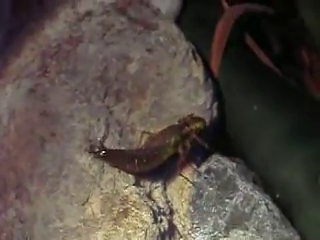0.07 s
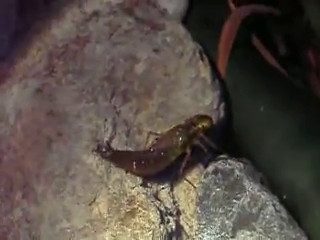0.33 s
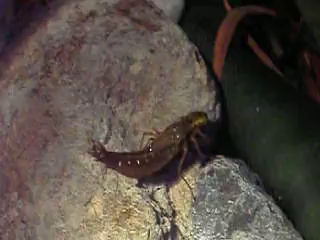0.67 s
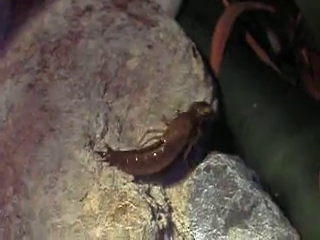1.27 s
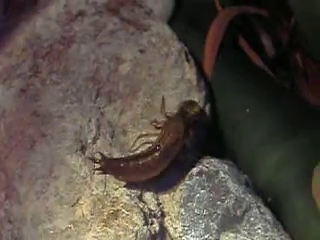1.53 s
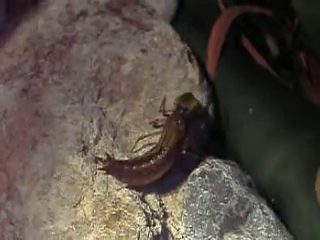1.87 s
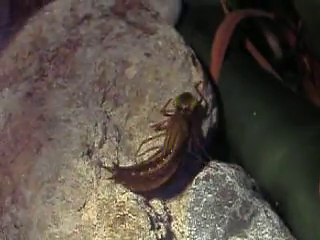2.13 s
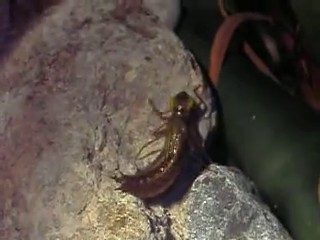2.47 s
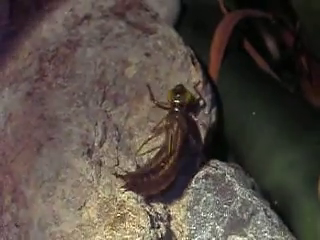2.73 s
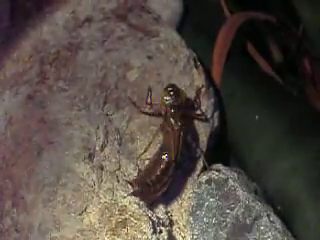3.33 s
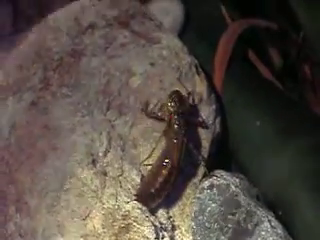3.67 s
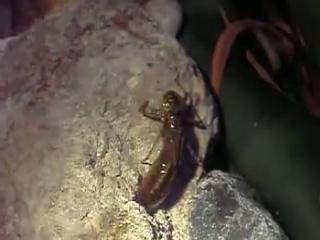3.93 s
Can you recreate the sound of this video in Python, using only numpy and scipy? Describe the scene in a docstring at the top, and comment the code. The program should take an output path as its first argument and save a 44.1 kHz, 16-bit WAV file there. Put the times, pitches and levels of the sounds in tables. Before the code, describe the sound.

Several frogs croak fast and without pause, their throaty and shrill calls overlapping.

```python
"""Five frogs croak around a garden pond at night, each about six times a second, the nearest two trading.
A croak is a short run of pulses ringing the throat and vocal sac, bending up in pitch as the sac fills.
The shrill frog's sac rings on as a fluttering note, and the garden scatters a short tail behind the croaks.
Underneath sits a bed of far-off frogs and a faint low rumble."""
import sys
import numpy as np
from scipy import signal
from scipy.fft import rfft, irfft
from scipy.io import wavfile

SR = 44100
rng = np.random.default_rng(int(sys.argv[2]) if len(sys.argv) > 2 else 0)


def wrap_up_sound(samples):
    """Save the sound to the file named by the first command line argument, as 16-bit audio."""
    columns = np.atleast_2d(samples).T
    # keep every value between -1 and 1, then stretch to whole-number steps
    tamed = np.clip(columns, -1, 1)
    steps = np.round(tamed * 32767).astype(np.int16)
    wavfile.write(sys.argv[1], SR, steps)


N = 176400

# Croak cues and accents for each frog: t/s, level/dB
NEAR_CUES = [(.0175, -3), (.1705, -2), (.2885, -2.5), (.4455, -2), (.5545, -4.5), (.6592, -2),
             (.7900, -1.5), (.9587, -1.5), (1.1222, -1), (1.2914, -2), (1.4737, -1), (1.6364, -1.5),
             (1.8061, -2), (1.9744, -1), (2.1436, -2), (2.3075, -1.5), (2.6892, -1), (2.8448, -1.5),
             (3.0031, -2), (3.1782, -1.5), (3.3418, -1.5), (3.5087, -1.5), (3.6692, -1.5), (3.8301, -0.5)]   # closest, full and throaty
SHRILL_CUES = [(0.088, -1.5), (0.258, -1.5), (.464, -3), (0.635, -2), (.829, -5), (1.002, -3), (1.207, -1),
               (1.373, -1.5), (1.569, -0.5), (1.741, -1), (1.917, 1), (2.105, -1), (2.278, 0.5), (2.433, 1),
               (2.585, 2.5), (2.779, -0.5), (2.963, -1), (3.127, 0), (3.302, 0), (3.453, 0.5), (3.59, -1.5),
               (3.746, -1)]   # answers the near frog
RASPY_CUES = [(-.02, 1), (.255, -3), (.538, -1.5), (.718, -1), (.886, 1.5), (1.054, 1), (1.226, 1.5),
              (1.386, 1), (1.556, -1.5), (1.728, -1), (1.898, -1.5), (2.071, -1.5), (2.235, -0.5),
              (2.405, -0.5), (2.596, 2), (2.764, 0.5), (2.933, -0.5), (3.099, 0), (3.271, -1), (3.435, 0.5),
              (3.60, -0.5), (3.765, -0.5), (3.933, -0.5)]   # a little further back
DEEP_CUES = [(.555, -0.5), (.738, -2.5), (.898, -2.5), (1.035, -4), (1.165, -1.5), (1.285, 1.5),
             (1.832, -5), (2.000, -4), (2.175, -5.5), (2.348, -3), (2.519, 2.5), (2.690, 2.5),
             (2.868, -2.5), (3.042, -2), (3.207, -2.5), (3.385, -2.5), (3.555, -1.5), (3.725, -3),
             (3.895, -4)]   # the lowest voice
THIN_CUES = [(.035, -2.5), (.198, -2), (.36, 0.5), (.595, -1.5), (.732, 2), (.935, -1.5), (1.11, 1),
             (1.325, -4.5), (1.50, 1), (1.672, -5), (1.838, -0.5), (2.012, 0), (2.20, -4.5), (2.48, -1.5),
             (2.645, -2.5), (2.885, 0.5), (3.075, -3), (3.265, -4.5), (3.47, 0), (3.65, 3), (3.955, 0.5)]   # small, across the pond
# Resonances of each frog's throat and vocal sac in mid-croak: f/Hz, level/dB
NEAR_FORMANTS = [(250, -46.5), (500, -38.5), (690, -22), (800, -3), (880, 2), (1010, -3), (1200, -7),
                 (1400, -25), (1600, -27.5), (1830, -15.5), (2060, 0.5), (2250, -11.5), (2430, -12.5),
                 (2740, -35), (3080, -14), (3380, -29.5), (3750, -52.5), (4400, -65)]
SHRILL_FORMANTS = [(500, -46.5), (750, -29), (1020, -0.5), (1300, -13.5), (1650, -27), (2050, -11),
                   (2400, 6), (2560, 5.5), (2760, -29.5), (3050, -14.5), (3400, -29.5), (3850, -29.5),
                   (4400, -58.5)]
RASPY_FORMANTS = [(500, -44), (750, -17), (970, 4), (1250, -13.5), (1640, -16), (1900, -6.5), (2070, 9),
                  (2250, -15), (2430, 6), (2700, -12.5), (3000, -7.5), (3300, -13.5), (3520, -15),
                  (3900, -39), (4400, -52)]
DEEP_FORMANTS = [(480, -47.5), (650, -20), (810, 1), (930, -6.5), (1200, -20.5), (1520, -36), (1790, -9),
                 (1860, -16), (1960, -1.5), (2180, -20.5), (2420, -5.5), (2720, -30), (3400, -35.5),
                 (4400, -62.5)]
THIN_FORMANTS = [(550, -36.5), (980, -0.5), (1200, -18), (1450, -14), (1660, -24.5), (2100, 0.5),
                 (2420, -1.5), (2700, -16.5), (2850, 2.5), (3020, -27), (3500, -21.5), (4400, -60.5)]
# Centre pitch of the shrill frog's sac through the scene: t/s, f/Hz
SAC_TUNING = [(.1, 2504), (.3, 2486), (.5, 2499), (.85, 2563), (1.05, 2490), (1.4, 2473), (2.5, 2469),
              (4, 2475)]
# Tone colour of the distant chorus and of the night's rumble: f/Hz, level/dB
CHORUS_SPECTRUM = [(450, -34.5), (750, -21), (1000, -8), (1600, -15), (2000, -4), (2400, 8), (2800, -9),
                   (3600, -19.5), (4200, -31), (5000, -63)]
RUMBLE_SPECTRUM = [(15, -5), (27, -1), (39, -3), (52, -8), (71, 0.5), (82, -6), (130, -12.5), (200, -16.5),
                   (500, -21.5), (1500, -31), (4000, -55)]

SETTLE_PULSES, FILL_PULSES = 1.3, 3.5   # time constants: the croak's two ends, the sac filling
GAP_JITTER_S, PACE_SPREAD, LEVEL_SPREAD_DB, PITCH_SPREAD = .0002, .013, .44, .01
PULSE_SHARP, PULSE_SAG_S = .041, .0015   # a pulse starts sharp by this share, then sags into tune
EDGE_TILT_DB_PER_OCTAVE = 2.5   # dulls the pulses at both ends of a croak
LEAD_IN_S, LEAD_IN_DB = .0065, -12   # a soft pickup pulse ahead of each croak
SAC_DB, SAC_LEAD_DB = -17.5, -9   # the note creeps in to SAC_LEAD_DB below full by the cue
SAC_LEAD_S, SAC_ATTACK_S, SAC_HOLD_S, SAC_RELEASE_S = .018, .012, .031, .009
SAC_PULSE_HZ, SAC_PULSE_DEPTH, SAC_RISE_HZ_PER_S, SAC_WAVER_HZ = 131, .33, 900, 28


def frog(cues, formants, level_db, count, gap_s, slow_start_s, swell_db, fade_db, rise, wet_db=-7):
    """Each croak is a quickening run of pulses; the resonances climb as the vocal sac fills."""
    k = np.arange(count)
    filling = 1 - np.exp(-k / FILL_PULSES)
    starting, ending = np.exp(-k / SETTLE_PULSES), np.exp(-k[::-1] / SETTLE_PULSES)
    rings = [throat_ring(formants, EDGE_TILT_DB_PER_OCTAVE * edge) for edge in starting + ending]
    n, peak = np.arange(len(rings[0])), np.argmax(np.abs(rings[0]))
    sagging = n + PULSE_SHARP * PULSE_SAG_S * SR * (1 - np.exp(-n / (PULSE_SAG_S * SR)))
    rings = [np.interp(sagging, n, ring) for ring in rings]
    track, span = np.zeros(N + 2 * SR), np.arange(SR // 10)   # one-second handles on the track
    for start_s, accent_db in cues:
        late, loud, detune = rng.standard_normal((3, count))
        pace = 1 + PACE_SPREAD * rng.standard_normal()
        gaps = (gap_s + slow_start_s * starting) * pace + GAP_JITTER_S * late
        onsets = LEAD_IN_S + np.cumsum(gaps) - gaps
        gains = from_db(LEVEL_SPREAD_DB * loud - swell_db * starting - fade_db * ending)
        pitches = 1 + rise * (filling - filling.mean()) + PITCH_SPREAD * detune
        pickup = (0, gains[0] * from_db(LEAD_IN_DB), pitches[0], rings[0])
        croak = sum(gain * np.interp((span - onset * SR) * pitch, n, ring, left=0, right=0)
                    for onset, gain, pitch, ring in [pickup, *zip(onsets, gains, pitches, rings)])
        at = int((start_s - LEAD_IN_S + 1) * SR) - peak
        track[at:at + len(span)] += from_db(level_db + accent_db) * rms_one(croak)
    voice = track[SR:SR + N]
    return voice + from_db(wet_db) * garden(voice)


def throat_ring(formants, tilt_db_per_octave, size=4096):
    """One pulse rings the throat: a fast attack and a decay (minimum phase), darkened by the tilt."""
    tilted = [(hz, db - tilt_db_per_octave * np.log2(hz / 1000)) for hz, db in formants]
    cepstrum = irfft(np.log(eq_curve(tilted, size)))
    cepstrum[1:size // 2] *= 2
    cepstrum[size // 2 + 1:] = 0
    return irfft(np.exp(rfft(cepstrum)))[:size // 4]


def shrill_sac():
    """The shrill frog's sac rings on from pulse to pulse: a fluttering, slightly rising note."""
    t, track = np.arange(SR // 10) / SR, np.zeros(N + 2 * SR)
    corners = np.cumsum([0, SAC_LEAD_S, SAC_ATTACK_S, SAC_HOLD_S, SAC_RELEASE_S])
    envelope = np.interp(t, corners, [0, from_db(SAC_LEAD_DB), 1, 1, 0])
    glide_hz = SAC_RISE_HZ_PER_S * (t - corners[2:4].mean())
    tremolo = 1 + SAC_PULSE_DEPTH * np.cos(2 * np.pi * SAC_PULSE_HZ * t)
    for start_s, accent_db in SHRILL_CUES:
        waver, flutter = (rms_one(low_pass(noise, hz=160)) for noise in rng.standard_normal((2, len(t))))
        hz = np.interp(start_s, *np.transpose(SAC_TUNING)) + glide_hz + SAC_WAVER_HZ * waver
        note = envelope * tremolo * np.sin(2 * np.pi * np.cumsum(hz) / SR)
        at = int((start_s - SAC_LEAD_S + 1) * SR)
        track[at:at + len(t)] += from_db(SAC_DB + accent_db + LEVEL_SPREAD_DB * flutter) * note
    return track[SR:SR + N]


def garden(voice, t60_s=.055, predelay_s=.003):
    """Stones, plants and walls scatter a short, dense tail."""
    t = np.arange(SR // 2) / SR
    tail = rng.standard_normal(len(t)) * from_db(-60 * t / t60_s) * (t > predelay_s)
    return signal.fftconvolve(voice, tail / np.linalg.norm(tail))[:N]


def far_chorus(level_db=-38, swing_db=3):
    """Distant frogs blur into a softly throbbing wash."""
    throb = rms_one(low_pass(rng.standard_normal(N + SR), hz=18)[SR:])
    return from_db(level_db + swing_db * throb) * coloured_noise(CHORUS_SPECTRUM)


def night_rumble(level_db=-53):
    """A faint, steady low end under the pond."""
    return from_db(level_db) * coloured_noise(RUMBLE_SPECTRUM)


def coloured_noise(spectrum):
    """Noise with the given spectrum, unit rms."""
    return rms_one(irfft(rfft(rng.standard_normal(N)) * eq_curve(spectrum, N), N))


def eq_curve(points, size):
    """Gain per FFT bin, drawn through the points on a log-frequency axis."""
    hz, db = np.transpose(points)
    bin_hz = np.maximum(np.arange(size // 2 + 1) * SR / size, 1)
    return from_db(np.interp(np.log(bin_hz), np.log(hz), db))


def low_pass(x, hz):
    """A gentle roll-off, 12 dB per octave."""
    return signal.sosfilt(signal.butter(2, hz, "low", fs=SR, output="sos"), x + 1e-18)


def from_db(db):
    """Decibels to gain."""
    return 10 ** (np.asarray(db) / 20)


def rms_one(x):
    """Scale to unit rms."""
    return x / np.sqrt(np.mean(x ** 2) + 1e-20)


def scene():
    """A mono mix: five frogs up front, the chorus and rumble behind."""
    near = frog(NEAR_CUES, NEAR_FORMANTS, level_db=-19.5, count=8, gap_s=.0062, slow_start_s=.0016,
                swell_db=3, fade_db=4, rise=.095, wet_db=-14.5)
    shrill = frog(SHRILL_CUES, SHRILL_FORMANTS, level_db=-29.5, count=6, gap_s=.0075, slow_start_s=.001,
                  swell_db=-1, fade_db=4, rise=.02, wet_db=-8.5)
    raspy = frog(RASPY_CUES, RASPY_FORMANTS, level_db=-28, count=8, gap_s=.0072, slow_start_s=.0011,
                 swell_db=5, fade_db=3.5, rise=.05)
    deep = frog(DEEP_CUES, DEEP_FORMANTS, level_db=-28, count=7, gap_s=.0081, slow_start_s=.001,
                swell_db=5.5, fade_db=7.5, rise=.064)
    thin = frog(THIN_CUES, THIN_FORMANTS, level_db=-34.5, count=6, gap_s=.0059, slow_start_s=.0012,
                swell_db=.5, fade_db=-1.5, rise=.016)
    return (near + shrill + shrill_sac() + raspy + deep + thin + far_chorus() + night_rumble())[None]


def record(dry):
    """A steep high cut takes the top off the mix."""
    cutoff_hz = 4380
    return signal.sosfilt(signal.ellip(10, .2, 80, cutoff_hz, fs=SR, output="sos"), dry)


dry = scene()
out = record(dry)
wrap_up_sound(out)
```